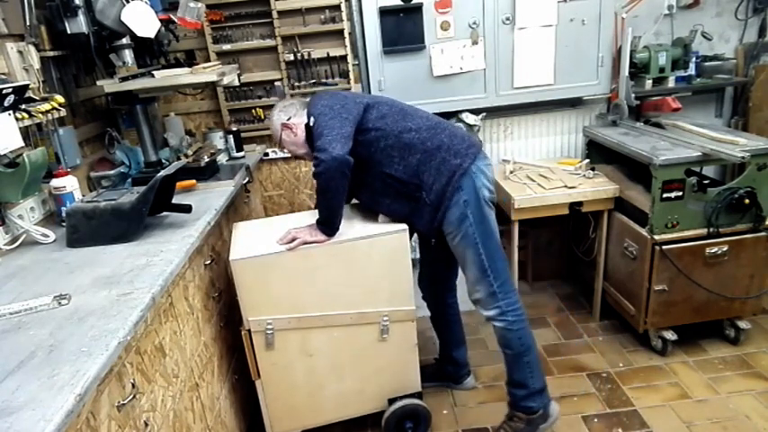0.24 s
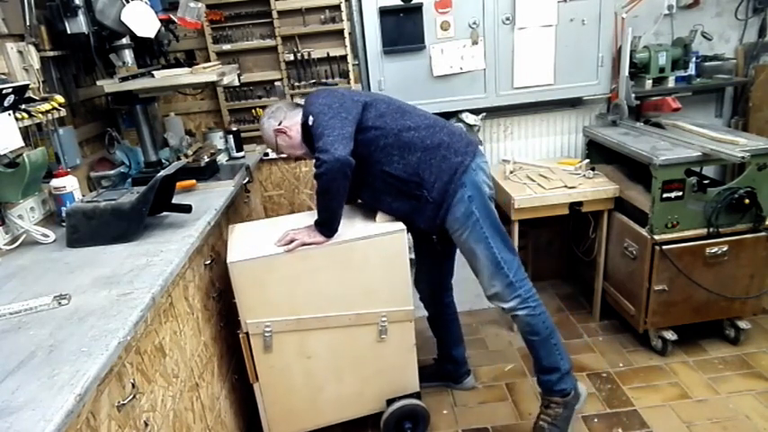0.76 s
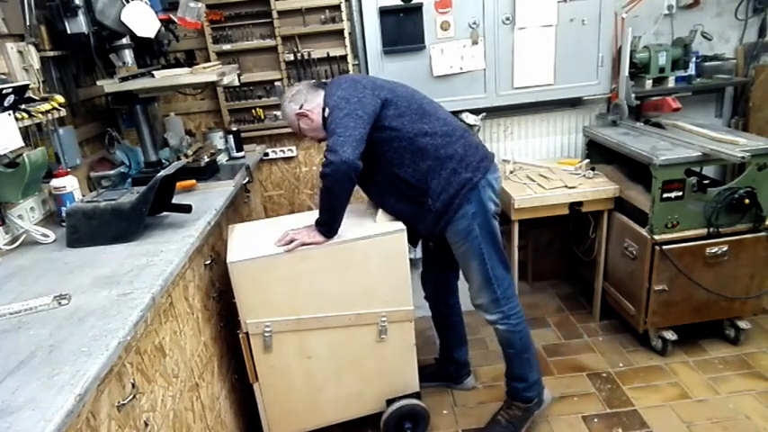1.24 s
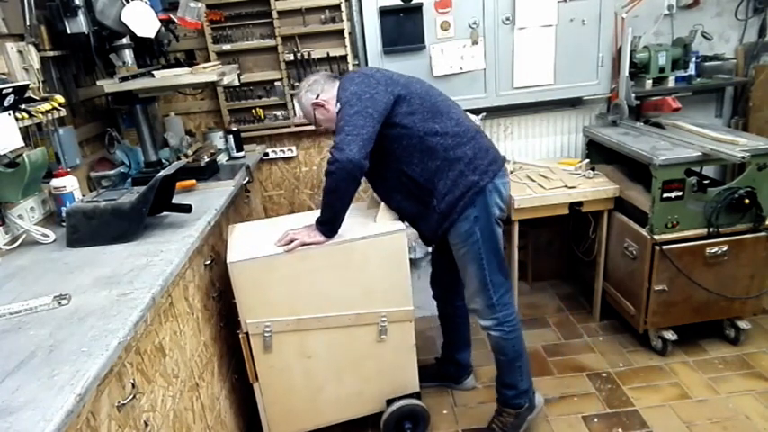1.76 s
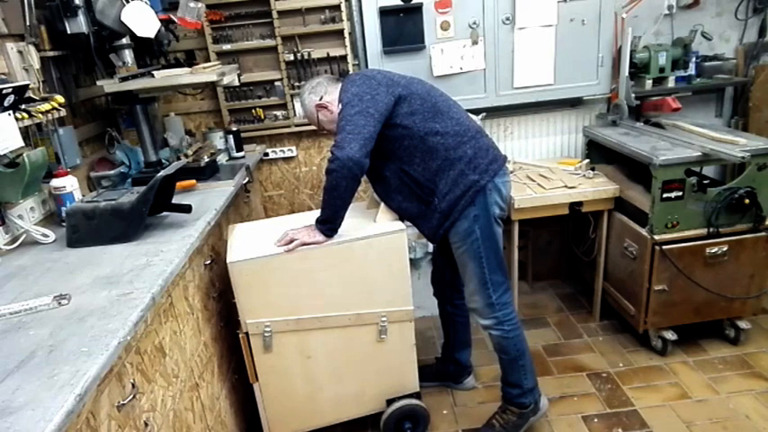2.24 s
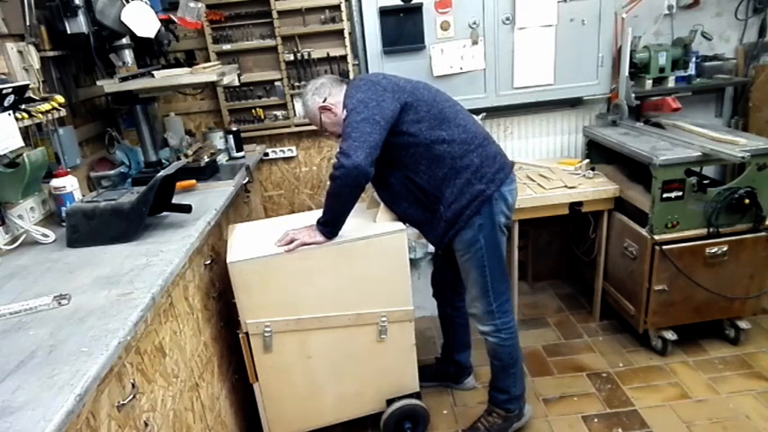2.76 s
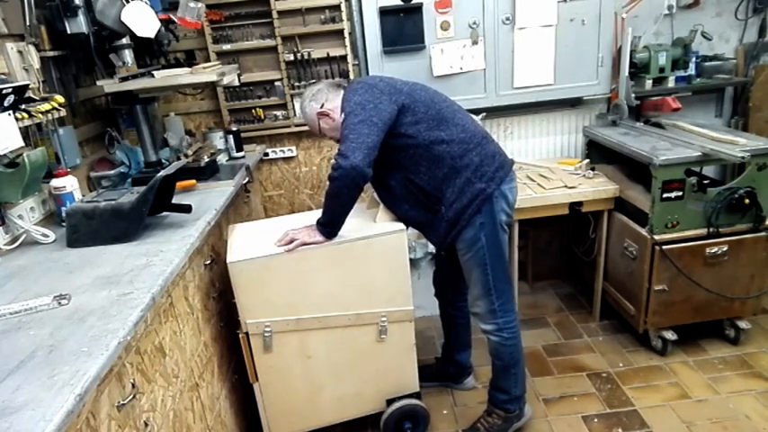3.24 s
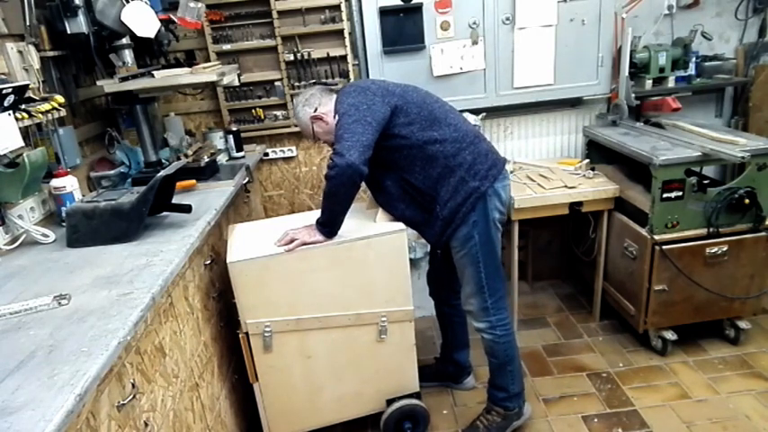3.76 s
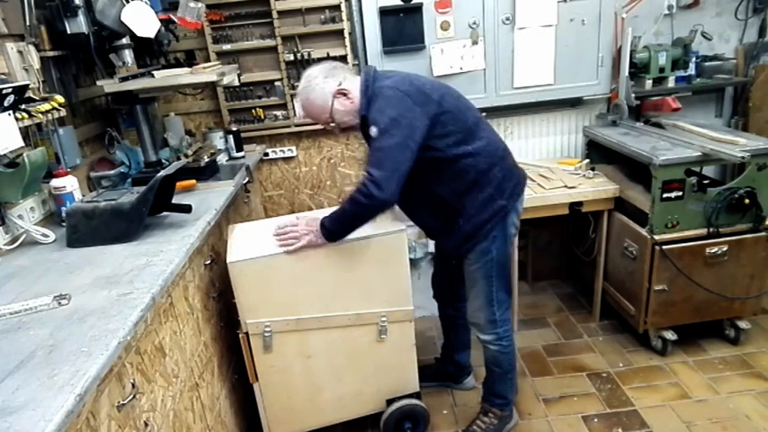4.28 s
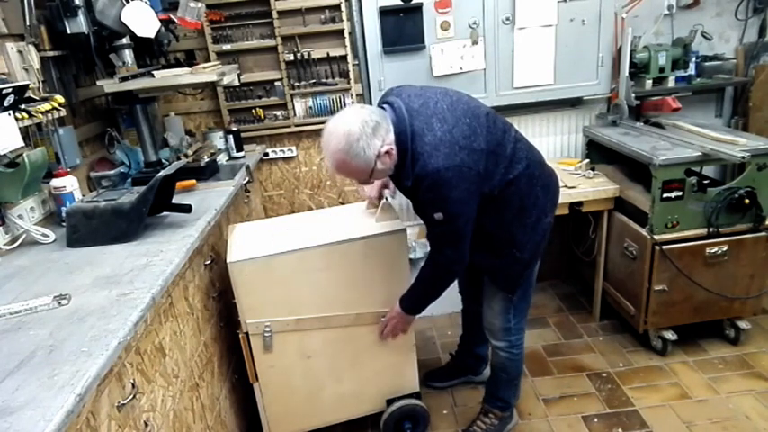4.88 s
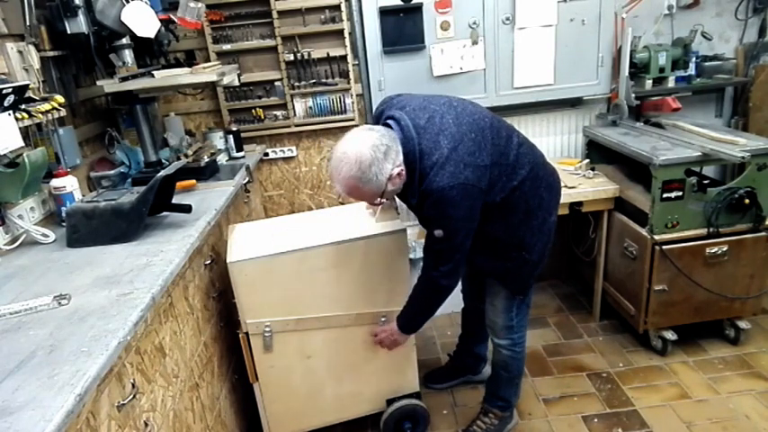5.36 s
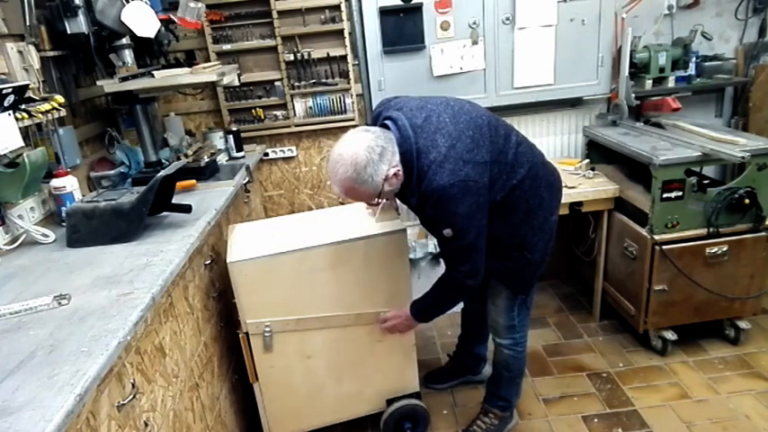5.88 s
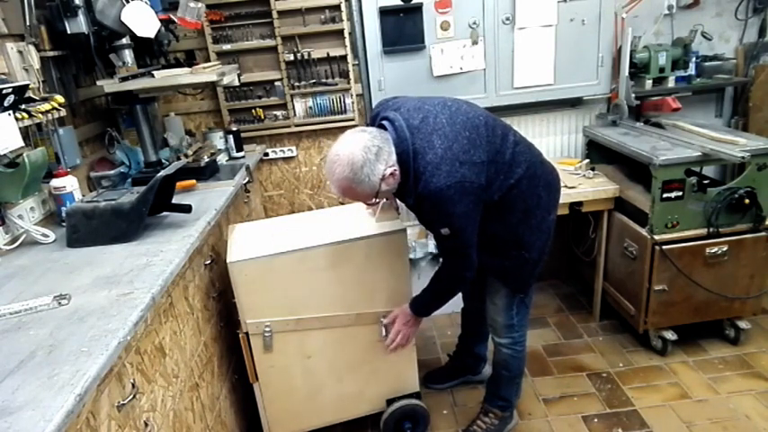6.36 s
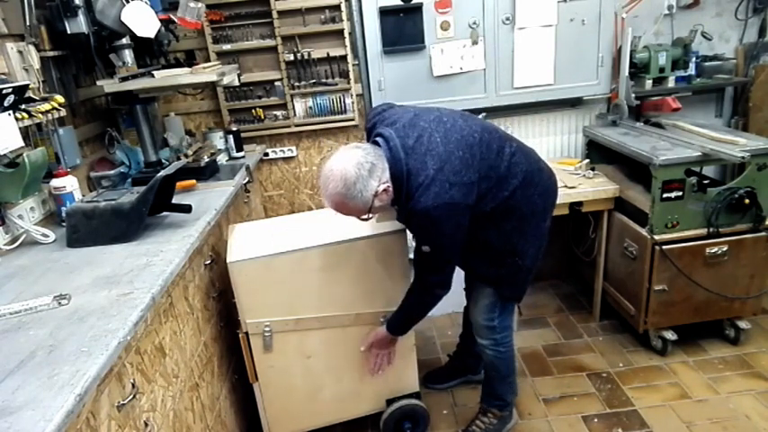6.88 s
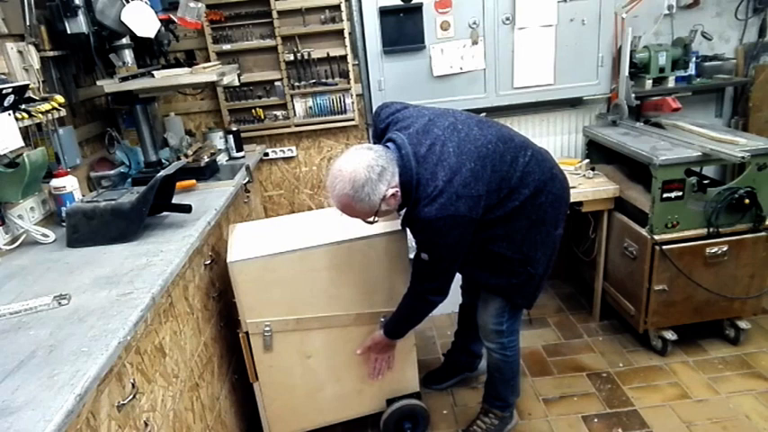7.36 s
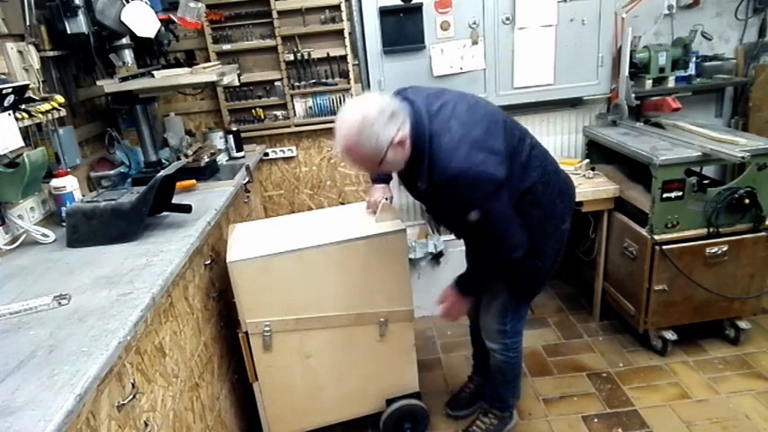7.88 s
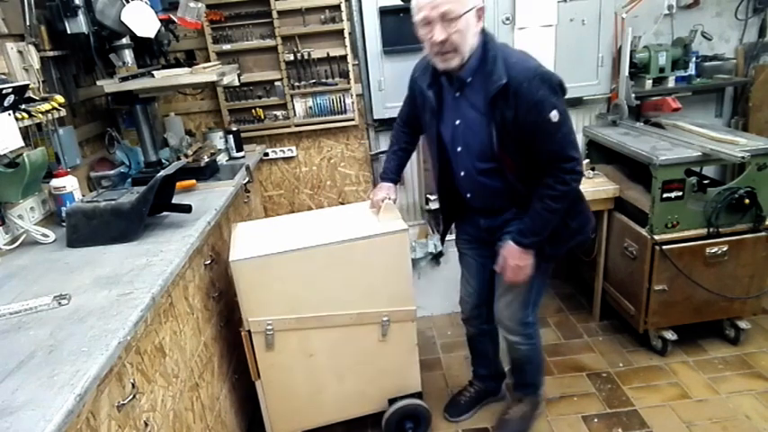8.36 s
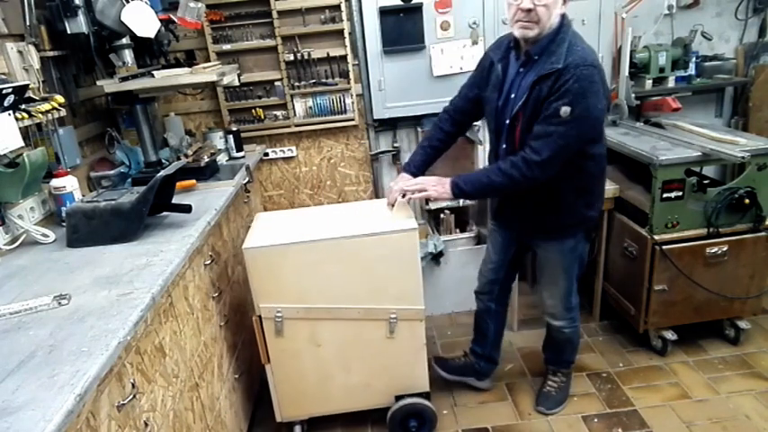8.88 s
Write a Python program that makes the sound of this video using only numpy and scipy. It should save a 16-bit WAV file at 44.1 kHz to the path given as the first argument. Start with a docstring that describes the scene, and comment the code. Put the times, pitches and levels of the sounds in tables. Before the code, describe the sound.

One microphone near a wooden cabinet in a small hard room. Knocks of wood on wood come irregularly, some with a deep hollow thump, with little rubs and creaky squeaks between. Then metal latches tick, rattle and snap shut brightly, a violent knock overloads the sound, and after near-quiet, gritty shoe scrapes and low rolling jolts finish it.

```python
"""First a quiet room hiss is heard, then wood knocking on wood as a plywood cabinet on wheels is closed up.
Its upper case is nudged into its seat, steel catches click and snap shut, and a hard blow settles the box.
Then shoes scuff on the tiles and the cabinet starts to roll.
Knocks and clicks are noise shaped by the panels and the room; thuds and clangs are sums of fading tones.
Squeaks are noise narrowed to one note; wheels, shoes and room hiss are noise with a moving level."""
import sys
import numpy as np
from scipy import signal
from scipy.fft import rfft, irfft
from scipy.io import wavfile

SR = 44100
rng = np.random.default_rng(int(sys.argv[2]) if len(sys.argv) > 2 else 0)


def unload_wav(signal):
    """Save mono or channel-first audio to the path in sys.argv[1] as 16-bit WAV at rate SR, clipped to [-1, 1]."""
    wavfile.write(
        sys.argv[1],
        SR,
        np.round(np.clip(np.atleast_2d(signal).T, -1, 1) * 32767).astype(np.int16),
    )


N = 402633
TIME = np.arange(N) / SR              # clock of the whole scene, s
RING = np.arange(int(.7 * SR)) / SR   # clock of one ringing sound, s


def from_db(db):
    """Decibels to gain."""
    return 10 ** (np.asarray(db) / 20)


def rms_one(x):
    """Scale to unit rms."""
    return x / np.sqrt(np.mean(x ** 2) + 1e-20)


def at_hz(points, hz):
    """Read a (f/Hz, value) table on a log-frequency axis."""
    f, value = np.transpose(points)
    return np.interp(np.log(hz), np.log(f), value)


def bump(hz, centre_hz, octaves):
    """A bell of height 1 on a log-frequency axis."""
    return np.exp(-.5 * (np.log2(hz / centre_hz) / octaves) ** 2)


def add(track, s, sound):
    """Mix a sound into a track at time s."""
    start = max(0, int(s * SR))
    track[start:start + len(sound)] += sound[:max(0, N - start)]


def noise(spectrum):
    """Unit noise with a given spectrum, falling steeply beyond its ends."""
    hz = np.maximum(np.fft.rfftfreq(N, 1 / SR), 1)
    low_hz, high_hz = spectrum[0][0], spectrum[-1][0]
    skirts = 1 / np.sqrt((1 + (low_hz / hz) ** 8) * (1 + (hz / high_hz) ** 8))
    shape = from_db(at_hz(spectrum, hz)) * skirts
    return rms_one(irfft(rfft(rng.standard_normal(N)) * shape, N))


def drift(rate):
    """A smoothly wandering random value, with a new random point rate times a second."""
    return np.interp(TIME * rate, np.arange(4000), rng.standard_normal(4000))


def swell(swell_s):
    """A contact takes a moment to build up; swell_s is its time constant."""
    return 1 - np.exp(-RING / swell_s)


def fade(fade_db=-8.5, fade_s=0.33):
    """Gain that turns a tail down ever faster: fade_db of extra fall is reached after fade_s."""
    return from_db(fade_db * (RING / fade_s) ** 3)


def struck(modes, swell_s, spread_db):
    """Modes swell and die as fading tones; each blow shares its force among them differently."""
    hz, db, t60 = np.transpose(modes)[:, :, None]
    gain = from_db(db + spread_db * rng.standard_normal(hz.shape) - 60 * RING / t60)
    tones = np.sin(2 * np.pi * (hz * RING + rng.random(hz.shape)))
    return (gain * tones).sum(0) * swell(swell_s) * fade()


# colour of the room hiss: (f/Hz, relative level/dB)
AIR_COLOUR = [(20, -7.5), (50, -10.5), (103, -13), (211, -14), (286, -10.5), (511, -21), (1080, -15.5),
              (1510, -14), (2550, -22), (3270, -18.5), (7100, -21.5), (14000, -27.5)]


def air(hiss_db=-68.6, rumble_db=-75):
    """Quiet room hiss, which is steady noise, over a faint, uneven low rumble."""
    waver = from_db(2.5 * drift(8))
    rumble = noise([(18, 9), (45, -1.5), (80, -3), (160, -17)]) * from_db(rumble_db) * waver
    return from_db(hiss_db) * noise(AIR_COLOUR) + rumble


# how loud the wheels rumble, before the trim and the bumps: (t/s, level/dB)
ROLLING = [(8.3, -87), (8.332, -72), (8.59, -42.5), (8.658, -55), (8.82, -58), (8.842, -52), (8.91, -64),
           (8.992, -73), (9.028, -45.5), (9.046, -44), (9.096, -59), (9.13, -57)]
# colour of the rolling: (f/Hz, relative level/dB)
RUMBLE_COLOUR = [(90, -10.5), (140, -2.5), (180, 1.5), (215, -7), (285, 4.5), (345, -5), (430, -13),
                 (600, -22), (900, -25)]


def rolling_wheels(trim_db=-1.0, bumps_db=4.5):
    """Wheels rumble through the box: low noise whose level jolts with the bumps."""
    rolling_db = np.interp(TIME, *np.transpose(ROLLING), left=-120)
    return from_db(trim_db + rolling_db + bumps_db * drift(40)) * noise(RUMBLE_COLOUR)


# colour of the gritty part of a scrape: (f/Hz, relative level/dB)
GRIT_COLOUR = [(500, -17), (1000, 2.5), (1800, -2), (3300, -4.5), (4500, -3.5)]
# colour of the hissing part of a scrape: (f/Hz, relative level/dB)
HISS_COLOUR = [(2800, -3.5), (4000, -1.5), (6000, 0), (8500, -11), (14000, -29)]
# a sole scrapes the tiles, hiss before its trim: (peak t/s, rise t/s, grit level/dB, hiss level/dB)
SCUFFS = [(8.335, 0.071, -73, -68.5), (8.53, 0.093, -65.5, -84), (8.58, 0.027, -50.5, -45),
          (8.725, 0.07, -54, -69), (9.04, 0.014, -78, -61), (9.125, .02, -54, -48.5)]


def scuffing_soles(hiss_trim_db=2.0, grain_db=0.6, fall_db_per_s=165):
    """Soles scrape over gritty tiles: two colours of grainy noise that swell and die away together."""
    grit, hiss = np.zeros((2, N))
    for s, rise_s, grit_db, hiss_db in SCUFFS:
        rise = np.exp(-(np.minimum(TIME - s, 0) / rise_s) ** 2)
        stroke = rise * from_db(-fall_db_per_s * np.maximum(TIME - s, 0))
        grit += from_db(grit_db) * stroke
        hiss += from_db(hiss_trim_db + hiss_db) * stroke
    grain = from_db(grain_db * drift(190))
    return (grit * noise(GRIT_COLOUR) + hiss * noise(HISS_COLOUR)) * grain


# thin squeaks of fittings and rubbing edges: (t/s, length t/s, f/Hz, width of one filter f/Hz, level/dB)
SQUEAKS = [(1.76, 0.093, 7050, 600, -55), (1.978, 0.11, 1690, 700, -45.5), (2.069, 0.15, 1410, 450, -49.5),
           (2.76, 0.108, 1370, 500, -53.5), (5.126, 0.075, 4330, 150, -59), (7.097, .08, 3760, 900, -60),
           (8.092, 0.085, 9460, 352, -65), (8.819, 0.11, 1990, 197, -67.5)]


def squeaks():
    """Rubbing fittings sing briefly on one unsteady note: noise narrowed twice by a sharp filter."""
    out = np.zeros(N)
    for s, length, hz, width_hz, db in SQUEAKS:
        b, a = signal.iirpeak(hz, hz / width_hz, fs=SR)
        once = signal.lfilter(b, a, rng.standard_normal(len(RING)))
        note = rms_one(signal.lfilter(b, a, once))
        age = 4 * RING / length   # loudest at age 1, a quarter of the length
        add(out, s, from_db(db) * note * age * np.exp(1 - age))
    return out


# lowest modes of the box on its wheels: (f/Hz, relative level/dB, time to fall 60 dB before the fade t/s)
BOOM_MODES = [(42.5, -0.5, 0.62), (55, -8, .36), (66, -7.5, 0.86), (87, -11.5, 0.5)]
# modes of the hollow inside: (f/Hz, relative level/dB, time to fall 60 dB before the fade t/s)
HOLLOW_MODES = [(101, -9, .25), (122, -11, 0.56), (137.7, -0.5, 0.5), (152.5, -5.5, 0.5),
                (173.6, 0.5, 0.33), (196, -11, 0.18), (229, -9, 0.36)]
# blows that shake the whole box: (t/s, boom level/dB, hollow ring level/dB, hollow driven hardest at f/Hz)
THUDS = [(0.347, -28, -29, 145), (.369, -52, -23, 156), (1.506, -66, -52, 133), (1.79, -58, -75, 130),
         (2.08, -63, -68, 130), (2.494, -48, -40, 150), (3.294, -72, -45.5, 124), (3.456, -63, -63, 140),
         (3.60, -52, -55, 130), (3.725, -47.5, -53, 130), (4.202, -46, -40, 135.7),
         (4.682, -52.5, -64, 135), (5.773, -77, -35, 160), (6.069, -72, -50, 139), (6.294, -67, -41.5, 157),
         (6.733, -33.5, -31, 136), (6.761, -48.5, -24, 191), (7.202, -34, -25.5, 160),
         (8.564, -41.5, -49, 146), (9.021, -45, -37.5, 164)]


def thuds(reach_octaves=0.37, swell_s=0.0012):
    """Heavy blows rock the box and sound its hollow; where they land decides which mode leads."""
    out = np.zeros(N)
    for s, boom_db, hollow_db, driven_hz in THUDS:
        # modes far from the driven pitch lose up to 10 dB
        hollow = [(hz, db + 10 * (bump(hz, driven_hz, reach_octaves) - 1), t60)
                  for hz, db, t60 in HOLLOW_MODES]
        add(out, s, from_db(boom_db) * struck(BOOM_MODES, swell_s, spread_db=1.0))
        add(out, s, from_db(hollow_db) * struck(hollow, swell_s, spread_db=1.0))
    return out


# ring of a struck catch: (f/Hz, relative level/dB, time to fall 60 dB before the fade t/s)
CLANG_MODES = [(941, -15.5, 1), (1210, -1.5, 0.51), (1260, -7, 0.4), (1680, -16.5, .37), (2770, -9, 0.33),
               (3750, -7.5, 0.37), (5100, -9.5, .26)]
# high ring of its small loop: (f/Hz, relative level/dB, time to fall 60 dB before the fade t/s)
JINGLE_MODES = [(7262, -7.5, 1), (7440, -6, 0.57), (9360, -4, .3), (9200, -0.5, 0.36), (9500, -11.5, .3),
                (11700, -5.5, .33), (12100, 0.5, .36), (12085, -6, .37)]
# a steel catch clicks or snaps: (t/s, click swell t/s, click level/dB, click weight as extra bass level/dB,
# click treble edge f/Hz, resonance of the struck spot f/Hz, clang level/dB relative to the click)
CATCHES = [(1.5, 0.0053, -28, -16, 8400, 2750, -6), (4.813, 0.0023, -48, -17, 7300, 3180, 4),
           (4.865, 0.0071, -50.5, -14, 11100, 5930, -7), (4.931, 0.00085, -42.5, -18, 11000, 4600, -10),
           (5.358, 0.0027, -62, -20, 6200, 1890, -12), (5.391, 0.0027, -54, -21, 6500, 4500, -13.5),
           (5.483, 0.0036, -53, -24, 6500, 1800, -12.5), (5.716, .0027, -41.5, -23.5, 8000, 2730, 2),
           (5.7701, 0.00094, -25, -10.5, 6460, 1400, 2.5), (6.013, 0.00085, -37, -20, 6460, 3170, -1.5),
           (6.045, 0.0027, -41, -11.5, 9000, 1250, -3.5), (6.068, 0.00025, -40, -10, 12000, 5030, -6),
           (6.281, 0.0046, -42.5, -22, 6450, 3190, -15), (7.879, 0.012, -51, -20, 7800, 3400, -13.5)]


def catches(jingle_db=-15.5):
    """Steel catches clang against the case; their small loops jingle high above, in step with the click."""
    out = np.zeros(N)
    for s, _, db, *_, clang_db in CATCHES:
        add(out, s, from_db(db + clang_db) * struck(CLANG_MODES, swell_s=.0008, spread_db=1.5))
        add(out, s, from_db(db + jingle_db) * struck(JINGLE_MODES, swell_s=.0008, spread_db=1.5))
    return out


# colour of a crack: (f/Hz, relative level/dB)
CRACK_COLOUR = [(700, -11.5), (1300, -1), (2500, 5), (3600, -8), (6000, -10), (9000, -20), (14000, -30.5)]
# hard stops of wood or steel on a rim: (t/s, noise level before its swell and decay/dB)
CRACKS = [(.3495, -16), (1.5026, -30.5), (2.4945, -18.5), (4.934, -33), (5.7695, -7), (7.2033, 5.5)]


def cracks(swell_s=0.0045, t60_s=0.039):
    """The hardest stops add a brief, bright burst of noise."""
    out = np.zeros(N)
    burst = swell(swell_s) * from_db(-60 * RING / t60_s)
    for s, db in CRACKS:
        add(out, s, from_db(db) * burst * noise(CRACK_COLOUR)[:len(RING)])
    return out


# colour common to all contacts: (f/Hz, level/dB)
PLYWOOD = [(100, -39), (170, -17), (235, -4), (294, -0.5), (369, 0), (463, -2.5), (581, -6), (729, -3.5),
           (914, -0.5), (1147, 3.5), (2800, 0.5), (4460, 2.5), (7500, 1), (14000, -5.5)]
# resonances of the panels: (f/Hz, height before contrast and valley level/dB)
PANEL_MODES = [(256, 5.5), (275, 0), (294, 8.5), (359, 7), (468, 7.5), (530, 5.5), (645, 8), (824, 5),
               (898, 2), (955, 5.5), (1078, 6.5), (1140, 4.5), (1237, 3), (1390, 5.5), (1529, 2),
               (1645, 8.5), (1753, 4), (1847, 6), (2020, 6.5), (2133, 3), (2313, 1.5), (2544, 4.5),
               (2592, -0.5), (2896, 8), (3070, 6), (3225, 8), (3718, 6.5), (3937, 4.5), (4640, 8.5),
               (5119, 8.5)]


def panels(hz, half_width_hz=7, damping=0.00027, valley_db=-1.88, contrast=1.06):
    """Colour of the box in dB: plywood, with narrow modes that widen towards the treble."""
    peaks = sum(db / (1 + ((hz - mode) / (half_width_hz + damping * mode)) ** 2)
                for mode, db in PANEL_MODES)
    valley = valley_db * (hz < PANEL_MODES[-1][0])
    return at_hz(PLYWOOD, hz) + contrast * peaks + valley


def contact_colour(hz, weight_db, edge_hz, spot_hz, count=90):
    """Colour of one touch in dB: weight sets the bass, hardness the treble; the struck spot rings out."""
    bass = 1 / (1 + (hz / 750) ** 4)
    # past its edge the treble falls steeply, then levels out 26 dB down
    treble_db = 10 * np.log10(1 / (1 + (hz / edge_hz) ** 7.4) + from_db(-26) ** 2)
    spot_db = 6 * bump(hz, spot_hz, octaves=.34)
    # no two touches drive the modes alike
    favoured = np.interp(np.sqrt(hz / hz[-1]), np.linspace(0, 1, count), rng.standard_normal(count))
    return weight_db * bass + treble_db + spot_db + 2.23 * favoured


# wood meets wood: (t/s, swell t/s, level/dB, weight as extra bass level/dB,
# hardness as treble edge f/Hz, resonance of the struck spot f/Hz)
KNOCKS = [(.325, 0.003, -53, -4, 5500, 1450), (.3385, 0.0017, -36.5, -1.5, 7050, 2840),
          (.3495, 0.0009, -28.5, -7, 6200, 2150), (1.015, 0.0072, -49, -14, 5600, 1500),
          (1.102, 0.0009, -51.5, -14, 5400, 1500), (1.3315, 0.0013, -46, -19, 6950, 3000),
          (1.675, 0.00054, -47.5, -17, 6460, 1380), (1.902, 0.0064, -45.5, -19.5, 6200, 1410),
          (2.233, 0.014, -46.5, -10, 6900, 1590), (2.454, .01, -38, -4, 5400, 1600),
          (2.492, 0.0038, -24, -17.5, 7500, 1540), (3.018, 0.012, -47.5, -12.5, 6040, 1250),
          (3.281, .008, -49, -4.5, 3130, 3100), (3.444, 0.011, -58.5, 3.5, 3270, 3100),
          (3.59, 0.019, -78.5, 20.5, 4500, 3000), (3.723, 0.0024, -34.5, -5.5, 4830, 2000),
          (4.199, .0022, -29.5, -4, 6000, 3030), (4.216, 0.0014, -37.5, -6.5, 4900, 1030),
          (6.294, 0.0041, -45.5, 5.5, 7200, 1280), (6.722, 0.0026, -46.5, 1, 4600, 2670),
          (6.735, 0.0013, -39.5, 2, 5380, 1050), (7.187, 0.0014, -45.5, 10, 6050, 1500),
          (7.197, 0.00092, -25, -23, 4960, 2750), (7.204, 0.0003, -20.5, -16.5, 6900, 2500),
          (9.026, .005, -74, 24.5, 5000, 1800)]
# surfaces slide in small slips: (t/s, length t/s, middle slip level/dB, growth along the slide level/dB)
SLIDES = [(1.129, 0.085, -62.5, -6), (1.301, 0.021, -56.5, 1), (1.361, .04, -52, -3),
          (1.766, 0.12, -63.5, -2), (1.982, 0.22, -69, -1.5), (2.433, .012, -57, 1), (2.69, .06, -66, -12),
          (3.62, 0.15, -70, 55), (5.049, 0.036, -66.5, 10), (6.353, 0.036, -62, -18), (7.006, 0.13, -70, 7),
          (7.70, 0.16, -71.5, 7)]


def contacts(count=4, scatter_db=0.5):
    """List every touch, in the columns of KNOCKS: knocks, catch clicks, and the uneven slips of each slide."""
    rows = list(KNOCKS) + [click for *click, _ in CATCHES]
    swell_s, weight_db, edge_hz, spot_hz = 0.0039, -15, 7200, 1460   # the same for every slip
    for s, length, db, growth_db in SLIDES:
        along = (np.arange(count) + rng.random(count)) / count   # 0 at the start of the slide, 1 at its end
        levels = db + growth_db * (along - .5) + scatter_db * rng.standard_normal(count)
        for at, level in zip(s + length * along, levels):
            rows.append((at, swell_s, level, weight_db, edge_hz, spot_hz))
    return rows


# decay of panels and room together: (f/Hz, time to fall 60 dB before the fade t/s)
DECAY = [(300, 0.41), (1300, 0.42), (2700, 0.4), (5500, .33), (12000, 0.29)]


def knocks(direct=0.3, direct_s=0.002, alike=0.1, echo_db=0.97, level_db=-1.1):
    """Each contact gives a short crack, then dense panel modes and reflections that die sooner in the treble."""
    hz = np.maximum(np.fft.rfftfreq(len(RING), 1 / SR), 1)
    third_octave = hz * (2 ** (1 / 6) - 2 ** (-1 / 6))   # bandwidth in Hz
    body = from_db(level_db + panels(hz)) * np.sqrt(SR / 2 / third_octave)
    # overlapping frequency zones, each with its own decay
    zone_hz, t60 = np.transpose(DECAY)
    zones = np.array([np.interp(np.log(hz), np.log(zone_hz), one) for one in np.eye(len(t60))])
    dying = from_db(-60 * RING / t60[:, None]) + direct * np.exp(-RING / direct_s)
    # all contacts are on one box in one room, so part of the pattern of reflections is shared
    common = rng.standard_normal(len(RING))
    out = np.zeros(N)
    for s, swell_s, db, weight_db, edge_hz, spot_hz in contacts():
        own = rng.standard_normal(len(RING))
        pattern = np.sqrt(alike) * common + np.sqrt(1 - alike) * own
        # bounces and reflections arrive in clusters a few milliseconds apart
        clusters = np.interp(RING, np.linspace(0, RING[-1], 200), rng.standard_normal(200))
        colour = from_db(db + contact_colour(hz, weight_db, edge_hz, spot_hz))
        spectrum = rfft(pattern * from_db(echo_db * clusters)) * body * colour
        parts = irfft(spectrum * zones, len(RING))
        add(out, s, (parts * dying).sum(0) * swell(swell_s) * fade())
    return out


def scene():
    """The room, the floor and the cabinet at one microphone."""
    background = air() + rolling_wheels() + scuffing_soles()
    cabinet = squeaks() + thuds() + catches() + cracks() + knocks()
    return (background + cabinet)[None]


def record(dry, cutoff_hz=14450):
    """Peaks beyond full scale are flattened, as in an overloaded microphone; then the top is cut."""
    top_cut = signal.ellip(10, .1, 70, cutoff_hz, fs=SR, output="sos")
    return signal.sosfilt(top_cut, np.clip(dry, -1, 1))


dry = scene()
out = record(dry)
unload_wav(out)
```